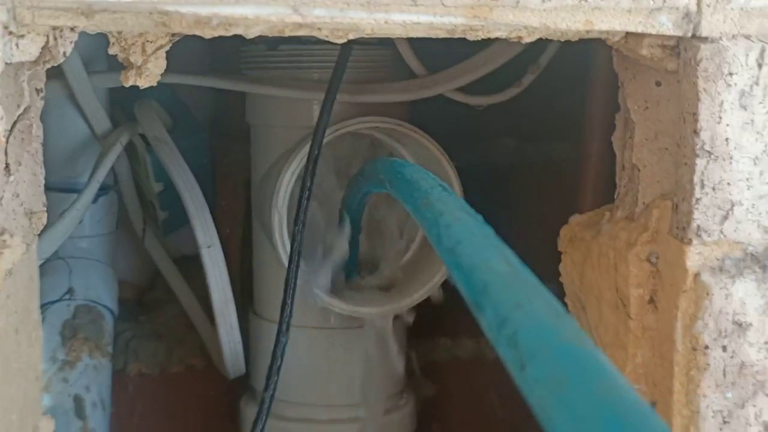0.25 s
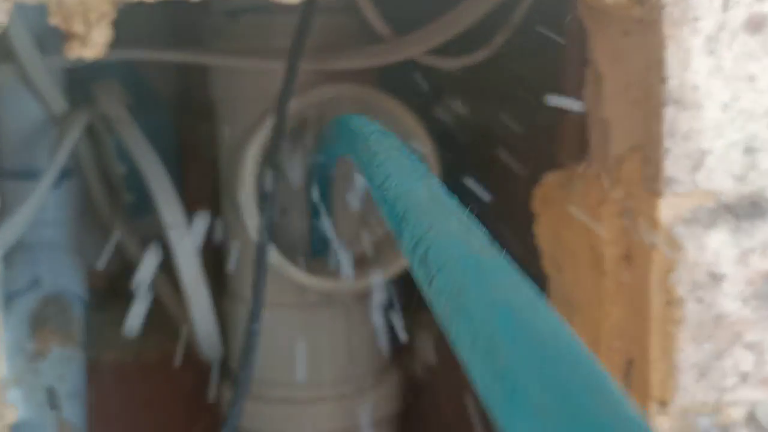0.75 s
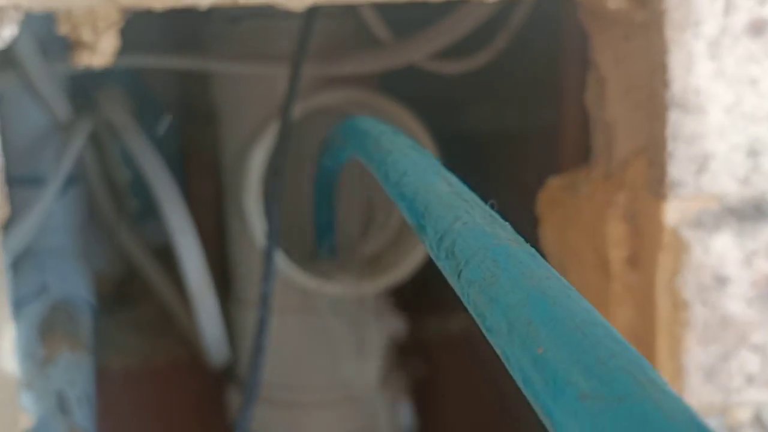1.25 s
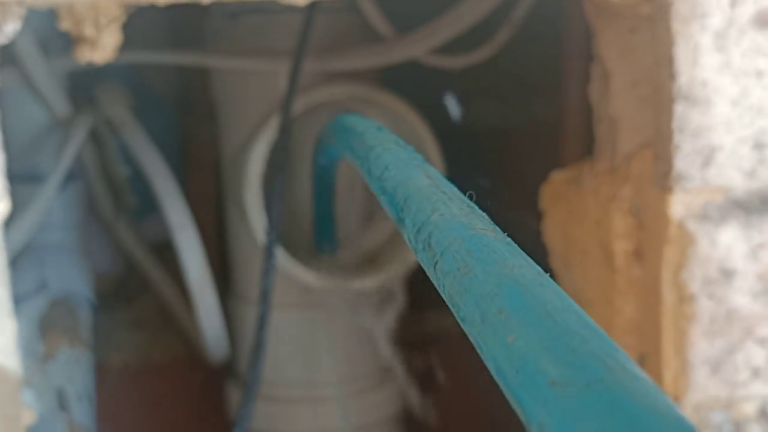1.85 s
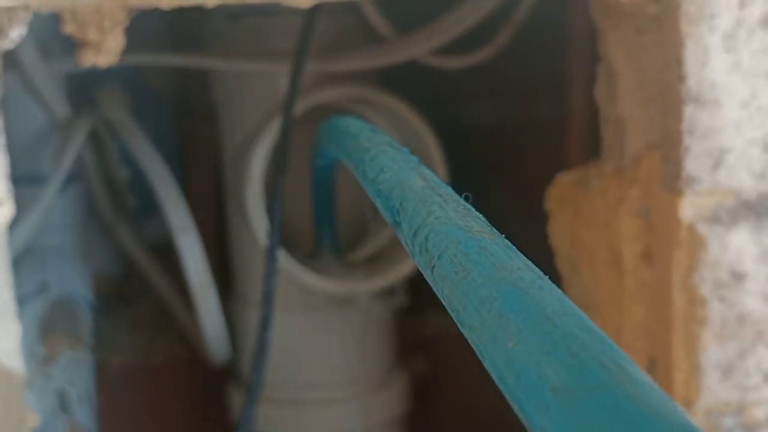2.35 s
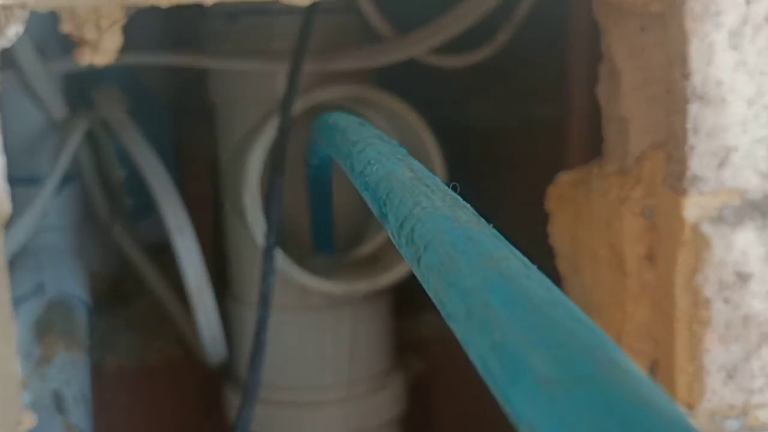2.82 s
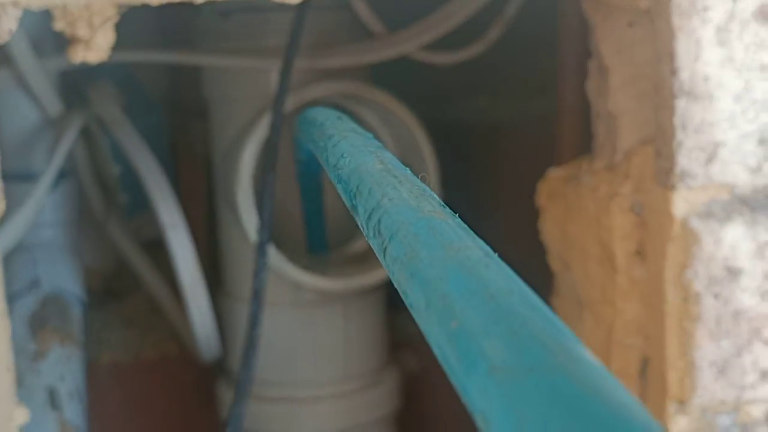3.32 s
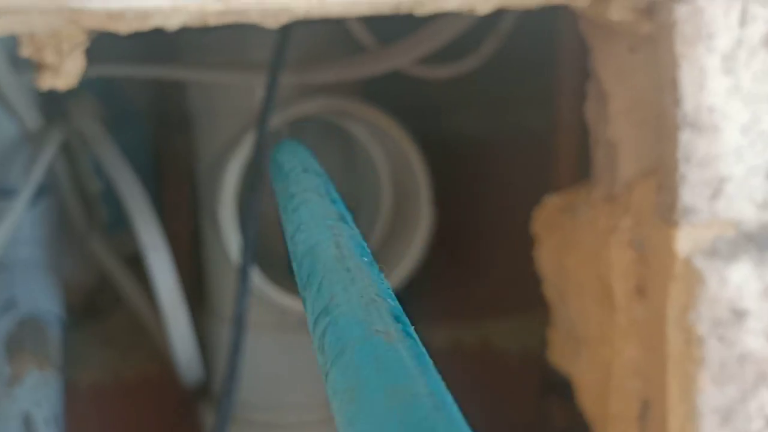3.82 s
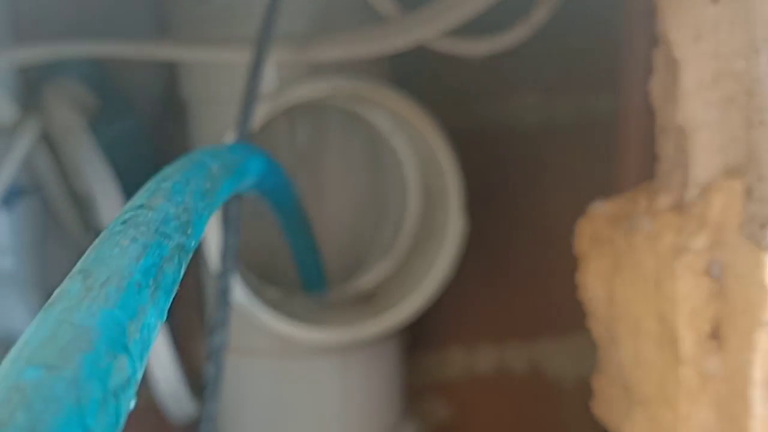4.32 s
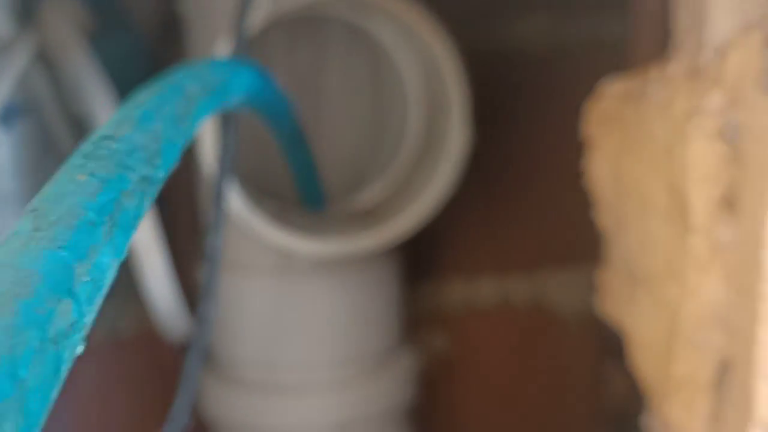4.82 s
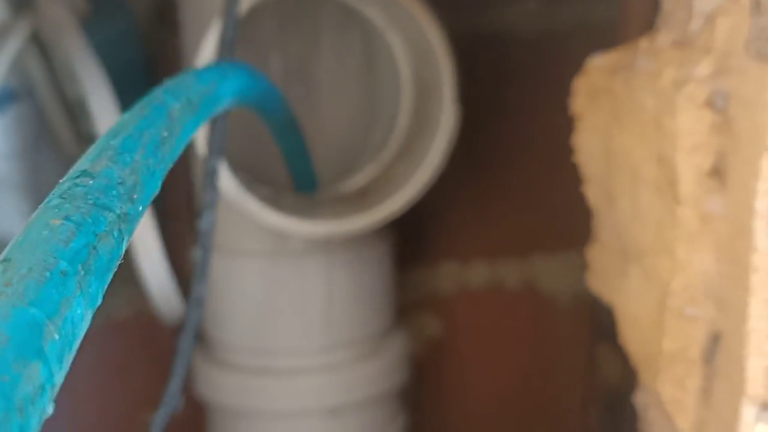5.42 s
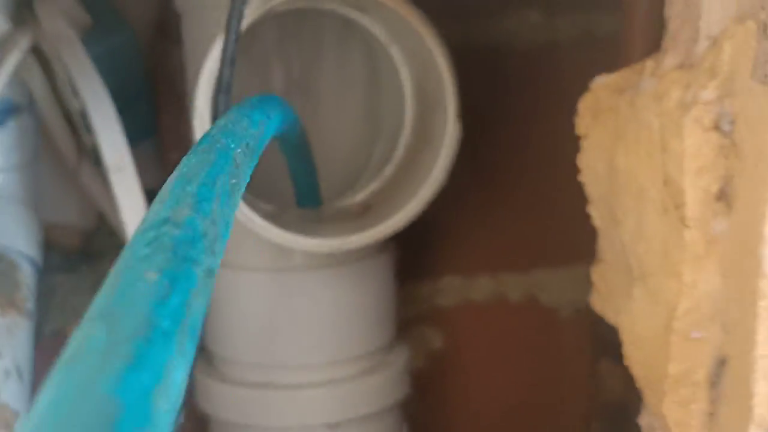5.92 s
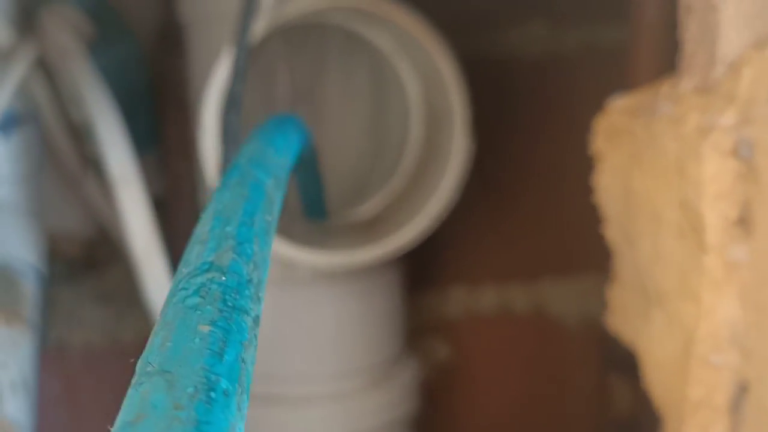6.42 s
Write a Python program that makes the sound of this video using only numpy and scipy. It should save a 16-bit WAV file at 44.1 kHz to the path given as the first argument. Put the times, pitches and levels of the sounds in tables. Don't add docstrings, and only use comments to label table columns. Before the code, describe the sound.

Churning water roars hollowly in a drain pipe, dies to drips and hose knocks, then a sharp air whistle chokes, spits, and water surges back.

```python
import sys
import numpy as np
from scipy import signal
from scipy.fft import rfft, irfft, next_fast_len
from scipy.io import wavfile
from scipy.ndimage import uniform_filter1d, map_coordinates

SR = 44100
rng = np.random.default_rng(int(sys.argv[2]) if len(sys.argv) > 2 else 0)


def pcm_store(signal):
    levels = np.round(np.clip(np.atleast_2d(signal), -1, 1) * 32767)
    wavfile.write(sys.argv[1], SR, levels.astype(np.int16).T)


def gain_from_decibels(decibels):
    exponent = np.asarray(decibels, float) / 20
    return 10 ** exponent


N = 293706
SIZE = next_fast_len(N + SR // 2)
HZ = np.maximum(np.arange(SIZE // 2 + 1) * SR / SIZE, 1.)
TIME = np.arange(N) / SR
SLOW = 40


def rms_one(x):
    return x / np.sqrt(np.mean(x ** 2) + 1e-20)


def in_time(rows):
    s, *columns = np.transpose(rows)
    return [np.interp(TIME, s, c) for c in columns]


def at_hz(points, hz):
    table_hz, values = np.transpose(points)
    return np.interp(np.log(hz), np.log(table_hz), values)


def chance(rate):
    r = np.exp(-2 * SLOW * np.pi * rate / SR)
    noise = rng.standard_normal(N // SLOW + 2002)
    return rms_one(signal.lfilter([1], [1, -2 * r, r * r], noise)[2000:])


def every_sample(slow):
    return np.interp(np.arange(N) / SLOW, np.arange(len(slow)), slow)


def drift(rate):
    return every_sample(chance(rate))


def envelope_db(start, attack, hold, release, db, sag_db):
    fade_db = 24
    held_db = db - sag_db * hold
    corners = start + np.cumsum([0, attack, hold, release])
    return np.interp(TIME, corners, [db - fade_db, db, held_db, held_db - fade_db], -120, -120)


def swells(rows, rise):
    s, first_db, length, second_db = np.transpose(rows)
    late = TIME[::SLOW, None] - s
    shape = np.exp(-(late / (length * np.where(late < 0, rise, 1))) ** 2 / 2)
    return np.array([every_sample(shape @ db) for db in (first_db, second_db)])


def coloured(spectrum):
    return rfft(rng.standard_normal(SIZE)) * gain_from_decibels(at_hz(spectrum, HZ))


def place(starts_s, shapes):
    at = (np.asarray(starts_s) * SR).astype(int)[:, None] + np.arange(shapes.shape[1])
    return np.bincount(at.ravel(), shapes.ravel(), N + shapes.shape[1] + 1)[:N]


def reflected(x, t60=0.044):
    t = np.arange(SR // 3) / SR
    echoes = rng.standard_normal(len(t)) * gain_from_decibels(-60 * t / t60)
    echoes = signal.sosfilt(signal.butter(2, 600, "high", fs=SR, output="sos"), echoes)
    return signal.fftconvolve(x, echoes / np.linalg.norm(echoes))[:N]


def cavity(direct, scattered, likeness, modes, balance):
    port_lag_s = .00003
    alike = np.clip(at_hz(likeness, HZ), -1, 1)
    mid = rfft(direct, SIZE) * np.sqrt(.5 + alike / 2)
    wide = rfft(scattered, SIZE) * np.sqrt(.5 - alike / 2)
    out = []
    for side in (1, -1):
        path = gain_from_decibels(side * at_hz(balance, HZ) / 2) * np.exp(1j * np.pi * side * HZ * port_lag_s)
        for hz, width, boost_db, pan_db in modes:
            near = slice(*np.searchsorted(HZ, [hz - 45 * width, hz + 45 * width]))
            boost = gain_from_decibels(boost_db + side * pan_db / 2) - 1
            path[near] *= 1 + boost / (1 + 2j * (HZ[near] - hz) / width)
        out.append(irfft((mid + side * wide) * path, SIZE)[:N])
    return np.array(out)


def churn(patchy_db, grain_db, spurt_db):
    # (frequency [Hz], density [dB per Hz])
    churn_low = [(15, -47), (25, -11), (59, -9.5), (113, -2), (163, -6.5), (200, -23), (235, -12.5),
                 (307, -18.5), (361, -7.5), (395, -10.5), (850, -7), (1100, -36), (1870, -120)]
    churn_high = [(500, -41), (850, -1), (983, -3), (1250, 2), (1560, 0.5), (2850, 2), (3500, 0), (4150, 0),
                  (4650, -4.5), (5200, -10.5), (6400, -10.5), (8480, -14), (15300, -23.5)]
    layer_edges_hz = [220, 850, 2200, 4800, 9500]
    noise = np.where(HZ < 850, coloured(churn_low), coloured(churn_high))
    layers = np.zeros((6, 2, N))
    slugs, froth = chance(5.8), chance(160)
    overflow = np.clip(2.2 - np.arange(len(slugs)) * SLOW / SR, .2, 1)
    for centre in 28 * 2 ** np.arange(0, 9.3, 1 / 3):
        mask = np.cos(np.pi / 2 * np.clip(3 * np.log2(HZ / centre), -1, 1)) ** 2
        band = irfft(noise * mask, SIZE)[:N]
        patchy = .6 if centre > 4500 else 1
        swell_db = patchy_db * patchy * (0.142 * slugs + chance(22.6))
        swell_db += grain_db * froth * (centre > 600)
        swell_db += spurt_db * np.clip(chance(28), 0, 2) ** 2 * overflow * (900 < centre < 3600)
        copies = np.array([band, np.roll(band, N // 2)])
        layers[np.searchsorted(layer_edges_hz, centre)] += every_sample(gain_from_decibels(swell_db)) * copies
    ends_s, fade_s, start_db, gain_db_per_s, dry_db = 2.35, .5, -0.5, 0.5, -3
    mist_db = np.interp(TIME, [0, ends_s, ends_s + fade_s], [start_db, start_db + gain_db_per_s * ends_s, dry_db])
    spray = layers[4] + gain_from_decibels(mist_db) * layers[5]
    return [rms_one(layer) for layer in (*layers[:4], spray)]


def bubbles(starts_s, db, hz, cycles, rise, size):
    turns = np.arange(size) / SR * np.asarray(hz)[:, None] / cycles
    swell = turns * np.exp(1 - turns)
    ring = np.sin(2 * np.pi * cycles * (turns + rise * turns ** 2))
    return place(starts_s, gain_from_decibels(np.asarray(db))[:, None] * swell * ring)


def surge():
    # (time [s], vigour [dB], break-up into fine spray [dB])
    flow = [(0, -20.5, -5.5), (.2, -20, 1), (.5, -24, 8.5), (.95, -24.5, 4.5), (1.25, -26, -1.5),
            (1.8, -27.5, -1.5), (2.3, -36, 0), (2.75, -44, 1), (3.15, -53, 2.5), (3.6, -64, 1),
            (4.9, -77, -5), (5.45, -60.5, 17.5), (5.67, -37.5, 2.5), (5.8, -31.5, 4), (5.97, -22.5, -5),
            (6.15, -20.5, -3), (6.4, -24, -4), (6.66, -25, -5.5)]
    # (time [s], boost [dB], length [s], break-up [dB])
    slugs = [(0.374, -1.5, 0.011, 11), (.62, 6, 0.044, -5.5), (0.752, 1, 0.035, -0.5), (.88, 2, 0.049, 4.5),
             (1.16, 5, 0.016, -2), (1.298, 5, 0.062, 0.5), (1.339, 2, 0.036, -7.5), (1.773, 2.5, 0.026, -5),
             (2.226, 5, 0.026, -2), (2.497, 3.5, 0.084, -1.5), (2.896, 5, 0.049, 1.5),
             (3.33, 3.5, 0.034, 2), (.74, 4, 0.07, -4), (6.2, -0.5, 0.04, 1), (6.606, 2.5, 0.022, -1.5)]
    # (time [s], boost [dB], length [s], break-up [dB])
    drags = [(.022, 2.5, 0.018, 1.5), (.735, 1.5, 0.024, 2), (.872, 2, 0.02, 1), (1.095, 6.5, .03, -1.5),
             (3.72, 2, 0.015, -2), (3.879, 3, 0.042, 11), (4.3, 5, 0.028, 2), (4.396, 19, 0.13, -2),
             (4.53, 11.5, 0.077, 6.5), (4.603, 9.5, 0.11, -1), (4.7, 13, 0.094, 1), (4.763, 8, 0.049, 7),
             (4.835, 16, 0.055, 1)]
    # (time [s], gurgle boost [dB], length [s], boom boost [dB])
    sloshes = [(.02, 6, 0.03, 0), (.2, -2, 0.15, 6), (.36, 8.5, 0.15, 3.5), (.56, 12.5, 0.084, 12.5),
               (0.758, 10.5, 0.11, 4.5), (1.0, 2, .06, 4), (1.2, -4, 0.072, -5), (1.34, 6.5, 0.13, 1),
               (1.52, 2.5, 0.035, 11), (1.7, -6.5, .05, 4), (1.86, 4, 0.051, 7.5), (2.08, -1.5, 0.046, 4),
               (2.22, 7.5, 0.15, 4.5), (2.48, 6, 0.11, 5.5), (3.6, 3, .08, 17), (4.421, 12, 0.038, 14),
               (4.652, 11, 0.14, 27), (5.76, 3.5, 0.1, -1.5), (5.9, -2.5, 0.093, -15),
               (6.096, 0.5, 0.035, -1), (6.3, 3, 0.48, -0.5), (6.619, -2.5, 0.066, 5)]
    # (level [dB], share of vigour [ratio], share of break-up [ratio])
    answers = [
        (-25.5, 0.63, -1.15),
        (-5, 1, -0.41),
        (-3.5, 0.95, 0.7),
        (-15, 0.77, 0.63),
    ]
    # (time [s], peak [dB], start pitch [Hz])
    gulps = [(.018, -1.5, 1254), (.065, -5.5, 2700), (0.092, -4, 2450), (.122, -2, 1044), (.182, -4, 1022),
             (.187, -3.5, 2850), (.24, -4.5, 1240), (.355, -4.5, 2830), (0.436, -7.5, 986),
             (.495, -4.5, 2870), (.58, -4, 1250), (0.289, 1, 2713), (0.629, 5, 2363), (0.757, 0.5, 1670),
             (0.804, 4, 2900), (0.832, -8, 3270), (0.876, 5, 2536), (0.899, -1, 2290), (0.928, 2.5, 2880),
             (0.968, -9, 986), (1.045, -6, 2610), (1.093, 4, 2073), (1.103, 4.5, 2240), (1.155, -4, 1644),
             (1.324, 0.5, 1234), (1.402, -7, 938), (1.506, -13.5, 1233), (1.778, -12, 1242),
             (1.849, -14, 1964), (2.12, -18, 1228), (2.215, -17, 1300), (5.798, -11, 2410),
             (5.902, -5, 2060), (5.938, -6.5, 1105), (5.978, -19, 1170), (6.088, -7, 1535),
             (6.172, -8.5, 1940)]

    steady = np.array(in_time(flow))
    stirred = steady + swells(slugs, rise=0.61) + swells(drags, rise=0.048)
    gurgle_db, boom_db = swells(sloshes, rise=0.61)
    drives = [steady, stirred, stirred, stirred]
    levels = [gain_from_decibels(db + np.dot(shares, drive)) for (db, *shares), drive in zip(answers, drives)]
    levels[0] = levels[0] * gain_from_decibels(gurgle_db)
    boom, *waters = churn(patchy_db=2.0, grain_db=1.0, spurt_db=1.0)
    noise = gain_from_decibels(-28.5 + 0.74 * steady[0] + boom_db) * boom
    noise = noise + sum(level * water for level, water in zip(levels, waters))

    born, size, pitch = rng.random((3200, 3)).T
    froth_db = -3.5 * np.log(size + 0.022)
    froth = bubbles(born * N / SR, froth_db, 900 * gain_from_decibels(13 * pitch), cycles=2.84, rise=0.027, size=800)
    settling = np.clip((2.6 - TIME) / 2.8, .25, 1)
    s, gulp_db, gulp_hz = np.transpose(gulps)
    pops = gain_from_decibels(stirred[0] - 2.5) * settling * rms_one(froth)
    pops = pops + bubbles(s, gulp_db - 17.0, gulp_hz, cycles=11.0, rise=0.011, size=1500)

    direct = noise[0] + pops
    echo_share = 0.81
    scattered = echo_share * reflected(direct) + np.sqrt(1 - echo_share ** 2) * noise[1]
    return direct + drops(), scattered


def background():
    # (frequency [Hz], density [dB per Hz])
    air_spectrum = [(15, -42), (25, -12), (79, -6.5), (147, -8), (203, -3.5), (338, -13), (398, -9),
                    (480, -22.5), (821, -16.5), (2050, -19), (2340, -22), (2610, -16.5), (15300, -31.5)]
    # (frequency [Hz], share common to both sides [ratio])
    air_likeness = [(60, 0.74), (240, 0.69), (950, -0.45), (3750, 0.15), (14900, -0.02)]
    # (frequency [Hz], level [dB rms])
    engine = [(48.5, -58), (72.8, -56.5), (97, -70), (145.5, -70)]
    alike = np.clip(at_hz(air_likeness, HZ), 0, 1)
    common = coloured(air_spectrum) * np.sqrt(alike)
    air = [irfft(common + coloured(air_spectrum) * np.sqrt(1 - alike), SIZE)[:N] for side in range(2)]
    speed = np.cumsum(1 + 0.0038 * drift(0.36)) / SR
    drone = sum(np.sqrt(2) * gain_from_decibels(db + 0.8 * drift(2.6)) * np.sin(2 * np.pi * hz * speed) for hz, db in engine)
    return gain_from_decibels(-54) * rms_one(np.array(air)) + drone


def drops():
    # (time [s], peak [dB], ring [Hz], t60 [s])
    rim_drops = [(1.6975, -17.5, 8200, 0.017), (1.8352, -24, 5600, .014), (1.9694, -29, 6430, .014),
                 (2.0953, -26.5, 6220, .014), (2.2228, -24, 4830, .014), (2.7125, -22, 6150, 0.023),
                 (2.8433, -34, 4890, .014), (3.1133, -42, 5660, .014), (3.2284, -40, 6400, .014),
                 (3.2725, -33, 6310, .014), (3.7962, -34, 7900, 0.012), (4.0687, -27, 8640, .011),
                 (4.2023, -35, 8760, 0.012), (4.395, -42, 4730, .014), (4.4902, -39, 8600, .025),
                 (4.5275, -35.5, 6700, .015), (4.5434, -41.5, 7400, .025), (4.57, -28, 6150, .022),
                 (4.593, -34, 5600, .02), (4.6925, -38.5, 6400, .014), (4.7107, -39, 8900, 0.0092),
                 (4.7192, -38, 8900, .006), (4.7308, -27.5, 9200, 0.008), (4.7365, -34, 8800, .006)]
    s, peak_db, hz, t60 = (c[:, None] for c in np.transpose(rim_drops))
    t = np.arange(700) / SR
    noise = rng.standard_normal((len(s), 2, len(t)))
    ring = gain_from_decibels(-0.5) * 4 * uniform_filter1d(noise[:, 1], size=24) * np.sin(2 * np.pi * hz * t)
    ticks = (0.56 * noise[:, 0] + ring) * gain_from_decibels(peak_db - 60 * t / np.maximum(t60, .002))
    return signal.sosfilt(signal.butter(2, 4500, "high", fs=SR, output="sos"), place(s[:, 0], ticks))


def ringing(level_db, modes, flicker_db):
    shape = sum(gain_from_decibels(db) / (1 + 2j * (HZ - hz) / width) ** 2 for hz, width, db in modes)
    noise = irfft(rfft(rng.standard_normal(SIZE)) * shape, SIZE)[:N]
    return gain_from_decibels(level_db + flicker_db * drift(25)) * rms_one(noise)


def draining():
    # (frequency [Hz], width [Hz], level [dB])
    column = [(106, 13, -0.5), (277.5, 28, -4), (339, 17.3, -0.5)]
    # (frequency [Hz], width [Hz], level [dB])
    trickle_modes = [(1300, 378, -9), (2020, 200, -11.5), (3100, 410, -4), (4080, 650, -1),
                     (6550, 1600, -9.5), (8340, 1700, -16.5)]
    hum_db = envelope_db(start=2.0, attack=.2, hold=.65, release=.4, db=-43, sag_db=10)
    trickle_db = envelope_db(start=2.3, attack=.6, hold=1.05, release=.35, db=-50, sag_db=8)
    runoff = ringing(trickle_db, trickle_modes, flicker_db=5.5)
    return ringing(hum_db, column, flicker_db=2.5) + np.array([runoff, reflected(runoff)])


def knocks():
    # (time [s], peak [dB], body [Hz], scuff [dB], left-right [dB])
    touches = [(3.462, -43, 298, -22.5, 11), (3.569, -43.5, 78, -15, 30), (3.674, -35, 132, -15, -7),
               (3.796, -40.5, 820, -13, 19), (4.068, -27, 340, -30, 5.5), (4.203, -53, 400, 11, 5),
               (4.308, -39.5, 513, -3, 15.5), (4.3949, -39, 380, 8.5, 7), (4.413, -40, 350, -12, 3),
               (4.418, -41, 352, -8, 3), (4.529, -38.5, 365, 4, 3), (4.57, -42, 370, 6, -3),
               (4.592, -52, 400, 16.5, -7), (4.642, -37.5, 480, -4, 18), (4.656, -43, 300, -6, -2),
               (4.691, -33, 387, -9, 0), (4.699, -34, 387, -14, -4), (4.761, -54, 400, 15, 4),
               (4.831, -53, 400, 15.5, 3), (5.762, -27.5, 216, -24.5, -1)]
    s, peak_db, hz, scuff_db, pan_db = (c[:, None] for c in np.transpose(touches))
    ring_cycles, scuff_t60_s = 8.5, 0.057
    t = np.arange(6000) / SR
    scuff = signal.lfilter([.15], [1, -1.3, .45], rng.standard_normal((len(s), len(t))))
    body = gain_from_decibels(-60 * t * hz / ring_cycles) * np.sin(2 * np.pi * hz * t)
    touch = gain_from_decibels(peak_db) * (body + gain_from_decibels(scuff_db - 60 * t / scuff_t60_s) * scuff)
    return np.array([place(s[:, 0], touch * gain_from_decibels(side * pan_db / 2)) for side in (1, -1)])


def tap():
    t = np.clip(TIME - 4.0692, 0, None)
    modes = [(1950, -31.5, 0.0089), (8600, -26.5, 0.0084), (14000, -26, .003)]   # (pitch [Hz], level [dB], t60 [s])
    tick = sum(gain_from_decibels(db - 60 * t / t60) * np.sin(2 * np.pi * hz * t) for hz, db, t60 in modes)
    pan_db = 10.5
    return tick * gain_from_decibels(np.array([[pan_db / 2], [-pan_db / 2]]))


def vent():
    # (time [s], pressure [dB])
    nozzle_air = [
        (5.035, -68.5),
        (5.052, -28.5),
        (5.075, -21.5),
        (5.3, -20.5),
        (5.385, -19),
        (5.43, -21.5),
        (5.535, -22),
        (5.575, -33),
        (5.76, -27.5),
    ]
    # (frequency [Hz],
    # density [dB per Hz])
    vent_bright = [(3290, -49.5), (5300, -30.5), (5750, -13.5), (6520, -8.5), (7680, -8.5), (8390, -3.5),
                   (10300, -11.5), (11100, -14), (13200, -14.5), (15300, -23)]
    vent_middle = [(3550, -43), (3850, -2), (4500, 0.5), (5600, -6.5), (6400, -33)]
    vent_dull = [(150, -37), (350, -4.5), (700, -9), (1500, -8.5), (3000, 1.5), (3330, -0.5), (3480, -43)]
    vent_choked = [(3000, -32), (3350, -1), (3900, -3.5), (4450, -7), (4800, -30.5)]
    choke_s, break_s, spit_s = 5.345, 5.415, 5.6
    pressure_db = in_time(nozzle_air)[0]
    choked = np.clip((TIME - break_s) / 0.062 + 1, 0, 1)
    blowing = np.clip((TIME - 5.04) / 0.0095, 0, 1) * np.clip((5.8 - TIME) / 0.24, 0, 1)

    open_db = -22.5
    hiss = 0
    for db, change_db, follows, spectrum in [(-1.5, -4.5, 0.45, vent_bright), (-7, -16.5, 0.65, vent_middle),
                                             (-16.5, -2.5, 0.7, vent_dull), (-48, 31, .7, vent_choked)]:
        level_db = open_db + follows * (pressure_db - open_db) + db + change_db * choked
        hiss = hiss + gain_from_decibels(level_db) * rms_one(irfft(coloured(spectrum), SIZE)[:N])

    edge_hz, edge_width_hz, climb_hz_per_s, narrowing = 6850, 1700, 52000, 1.1
    dry_jet = TIME < spit_s
    hz = np.where(dry_jet, edge_hz + climb_hz_per_s * (np.clip(TIME, choke_s, break_s) - choke_s), 5800)
    width = np.where(dry_jet, edge_width_hz * (edge_hz / hz) ** narrowing, 1900)
    settled = dry_jet & (TIME > break_s + .012)
    hz[settled], width[settled] = 8500, 1500
    level = gain_from_decibels(pressure_db + np.where(settled, -4, 1.5)) * blowing * dry_jet
    level = level + gain_from_decibels(envelope_db(spit_s, attack=.11, hold=.08, release=.25, db=-30, sag_db=20))
    reading = np.broadcast_arrays([[0], [1]], np.cumsum(width / SR))
    wobble = map_coordinates(rng.standard_normal((2, N // 4)), reading, order=1)
    phase = 2 * np.pi * np.cumsum(hz) / SR
    tone = (wobble[0] * np.cos(phase) + wobble[1] * np.sin(phase)) * level
    return (blowing * hiss + tone) * gain_from_decibels(1.6 * drift(140))


def scene():
    # (frequency [Hz], share [ratio])
    water_likeness = [(90, .99), (300, .94), (700, .78), (960, .93), (1250, .5), (2600, .76), (4500, .12),
                      (8000, .03)]
    vent_likeness = [(60, 0.91), (240, 0.21), (950, 0.61), (3750, -0.57), (14900, -0.34)]
    # (frequency [Hz], left-right [dB])
    water_balance = [(60, 0), (125, -0.5), (250, -2.5), (600, 3), (1300, -1), (2400, 1.5), (4400, -3),
                     (8000, 0), (14900, -6)]
    vent_balance = [(300, 0), (3000, 8), (5500, 0.5), (7000, -3), (8300, 12), (9500, 5), (11500, -14.5),
                    (14000, -16.5)]
    # (frequency [Hz], width [Hz], boost [dB], left-right [dB])
    pipe = [(100, 14, 3, 0), (127, 16, 6, 0), (152, 14, 4, 0), (480, 50, 4, 0.5), (994, 60, 8, 1),
            (1245, 70, 7, 1), (1430, 90, 3, 0.5), (1720, 110, 3, 0.5), (2000, 110, 7, 0.5),
            (2500, 110, 5, 0.1), (2820, 120, 8, -0.5), (3150, 110, 4, .5), (3700, 90, 3, -1),
            (4250, 160, 3, -1), (6600, 300, 3, .1), (8300, 400, 4, 2)]
    # (frequency [Hz], width [Hz], boost [dB], left-right [dB])
    empty_pipe = [(400, 62, 5, -5.5), (951, 53, 20.5, -4), (1512, 110, 12, -2), (2200, 240, 15.5, -10.5),
                  (2415, 210, -22.5, -1), (3251, 41, 12.5, -8), (3540, 450, -6.5, -0.5),
                  (4230, 60, -4.5, 1.5), (4830, 58, 6, -4.5), (5580, 310, 3, -13), (5860, 200, 0, 1.5),
                  (6260, 43, 5, 3.5), (6530, 18, 9.5, 2.5), (6680, 60, 8, 0.5), (6900, 30, 8.5, 7),
                  (7260, 25, 7, -6), (7980, 18, 0, 0), (8230, 50, 10, 0.5), (8360, 24, 3.5, 1),
                  (8640, 69, 5, -8), (8750, 30, 13, -2), (9450, 30, 8, -12), (11180, 170, -14.5, -2)]
    water = cavity(*surge(), water_likeness, pipe, water_balance) + draining()
    jet = vent()
    air = cavity(jet, reflected(jet, t60=.08), vent_likeness, empty_pipe, vent_balance)
    return water + air + knocks() + tap() + background()


def low_pass(x):
    return signal.sosfilt(signal.butter(12, 15490, fs=SR, output="sos"), x)


def record(dry):
    heard = signal.sosfilt(signal.butter(4, [40, 14300], "band", fs=SR, output="sos"), dry)
    rounded = 1.2 * np.tanh(heard / 1.2)
    heard = signal.sosfilt(signal.cheby2(10, 40, 16100, fs=SR, output="sos"), rounded)
    return low_pass(heard)


dry = scene()
out = record(dry)
pcm_store(out)
```